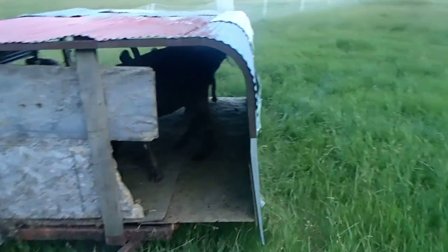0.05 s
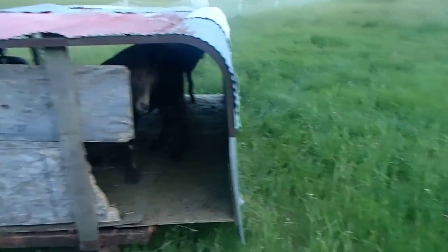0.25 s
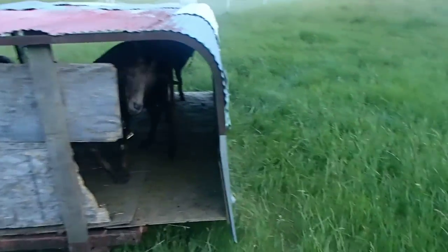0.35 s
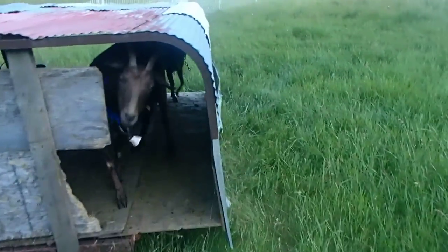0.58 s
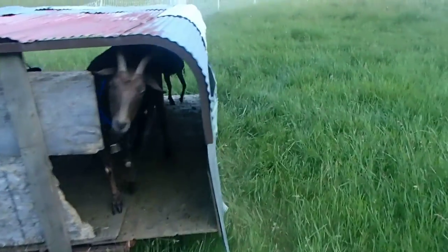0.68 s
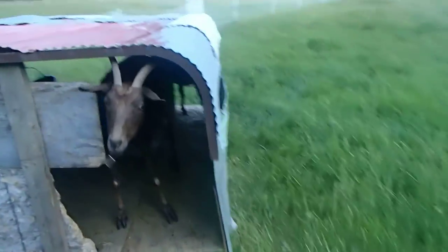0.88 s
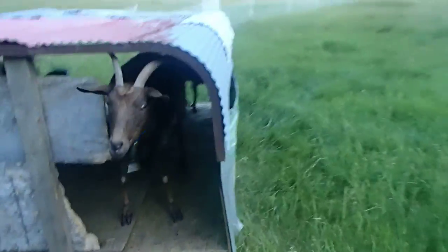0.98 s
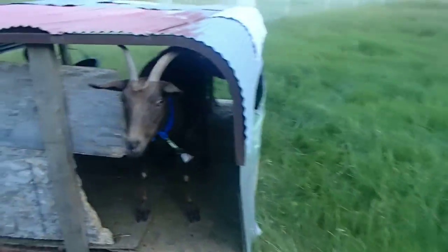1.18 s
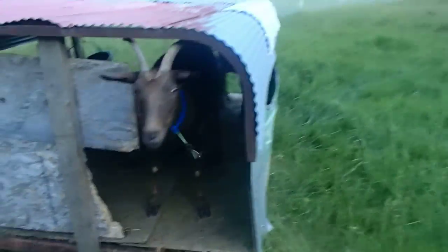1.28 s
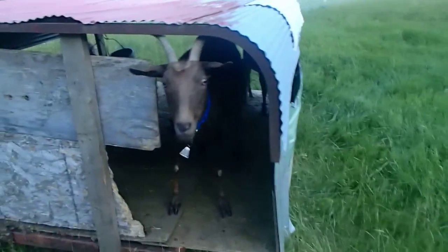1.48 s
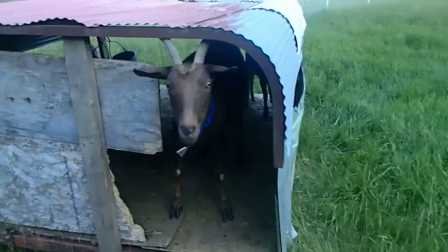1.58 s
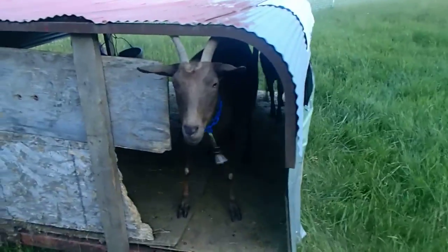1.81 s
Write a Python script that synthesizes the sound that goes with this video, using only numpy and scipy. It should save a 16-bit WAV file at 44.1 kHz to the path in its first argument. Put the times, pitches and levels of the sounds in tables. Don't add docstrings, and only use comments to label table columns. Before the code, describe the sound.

A small sheet-metal goat bell clanks at 0.1, 0.2 and 0.33 s, each stroke harder. From 0.4 s hooves scuff boards and kick pebbles, with a hard knock at 0.77 s and straw snaps. A light strike at 0.88 s precedes a run from 1.26 s, loudest at 1.55 s, then a last stroke at 1.85 s. Field hiss, straw rustle and tiny bird chirps lie behind; short wooden-shelter echo, close phone microphone.

```python
import sys
import numpy as np
from scipy import signal
from scipy.fft import rfft, irfft
from scipy.io import wavfile
from scipy.ndimage import uniform_filter1d

SR = 44100
rng = np.random.default_rng(int(sys.argv[2]) if len(sys.argv) > 2 else 0)


def store_pcm(level_fs):
    pcm = np.round(np.clip(level_fs, -1, 1) * 32767).astype(np.int16)
    wavfile.write(sys.argv[1], SR, np.atleast_2d(pcm).T)


def voltage_ratio(decibels):
    exponent = np.asarray(decibels, float) / 20
    return 10 ** exponent


N = 81585

# pitch_hz, level_db (per Hz)
FIELD_TONE = [(15, -45), (25, 10), (236, 1.5), (1100, -3), (1400, -8), (2410, -14), (3720, -4.5),
              (9570, -7.5), (16000, -6.5)]
# time_s, straw_db, shuffle_db
MOVEMENT = [(0.0, -41.5, -46), (0.334, -44, -51.5), (0.582, -42.5, -45), (0.716, -47, -57),
            (0.958, -44, -52.5), (1.16, -44, -58.5), (1.334, -48, -52.5), (1.448, -44.5, -48.5),
            (1.7, -45, -53), (1.85, -48, -57)]
# pitch_hz, level_db (per Hz)
STRAW_TONE = [(300, 6.5), (4600, -11.5), (5800, 6.5), (10500, 4), (12500, -0.5), (16000, -28)]
# pitch_hz, level_db (per Hz)
SHUFFLE_TONE = [(60, -31), (230, 9), (420, -7.5), (1250, -8), (1750, 10), (2050, -1.5), (2450, -10),
                (16000, -6.5)]
# start_s, length_s, level_db, start_hz, end_hz
CHIRPS = [
    (.678, 0.012, -43.5, 4060, 4200),
    (1.175, .012, -41, 7400, 4950),
    (1.593, .012, -32, 4000, 4300),
    (1.732, 0.0098, -37.5, 7760, 5400),
    (1.823, 0.011, -37, 7555, 4800),
]
# start_s, peak_db, centre_hz
STRAW_SNAPS = [(0.316, -21.5, 8950), (0.7955, -19.5, 6660), (0.802, -27, 7500), (0.814, -14, 7900),
               (0.839, -34, 6000), (0.9302, -16, 7540), (1.0272, -25.5, 9350), (1.2233, -26, 6740),
               (1.731, -17, 9008), (1.734, -23, 6600), (1.7947, -24, 8060), (1.7974, -22.5, 8500)]
# pitch_hz, level_db, t60_s (time to fade by 60 dB)
BOARD_MODES = [(135.5, -37, 0.024), (272, -2.5, 0.035), (365, -6.5, 0.04), (642, 3, 0.011),
               (894, -4.5, 0.013), (1190, -2, 0.014)]
# pitch_hz, level_db, t60_s
GRIT_MODES = [(870, -12.5, 0.016), (1280, -17, 0.0048), (1530, 2.5, 0.013), (1780, 5.5, 0.023),
              (1840, -21, 0.006763), (3000, -2, 0.004)]
# pitch_hz, level_db, t60_s
EDGE_MODES = [(870, -14.5, 0.027), (1300, -11, .01), (1581, 4.5, 0.015), (1797, -3, 0.015),
              (3050, -12, 0.01031), (5640, -13, 0.0073)]
# start_s, level_db, scrape_length_s, scuff_share_db
THUMPS = [(0.037, -42, 0.071, -2), (0.102, -48, 0.01475, 1), (0.424, -39, 0.019, -16),
          (0.402, -25, 0.006, -3.5), (0.414, -37, 0.029, -17), (0.688, -41, 0.044, 6),
          (0.542, -41, 0.046, -18), (.585, -43.5, 0.034, -20), (0.609, -28, 0.0074, 33),
          (0.621, -27.5, 0.0089, 26), (0.77, -34, 0.0055, -21), (0.786, -33, 0.0235, -26),
          (0.888, -43.5, 0.0345, -1), (1.12, -41, 0.054, 14), (1.205, -37, 0.024, -4),
          (1.223, -30, 0.017, -4), (1.237, -30, .012, -23), (1.461, -28, 0.011, -2.5),
          (1.484, -39.5, 0.014, -12), (0.931, -44.5, 0.043, -27), (.36, -47, 0.025, -21)]
# start_s, level_db
KNOCKS = [
    (0.045, -36),
    (.769, -6.5),
    (0.8148, -27.5),
    (1.0276, -37),
    (1.7285, -32),
]
# delay_s, level_db
KNOCK_ECHOES = [(.0065, -20), (.0105, -30), (0.017, -41), (.022, -49)]
# start_s, level_db, pitch_hz
HOOF_TAPS = [(.527, -27, 900), (.558, -29, 750), (.566, -25, 1000), (0.44, -28, 890), (0.589, -32, 560),
             (.601, -29, 1695), (.637, -38, 1400), (.672, -25.5, 880), (.184, -38, 630), (0.33, -37.5, 118),
             (.89, -38, 150), (.068, -31.5, 234), (1.1, -28.5, 330), (0.24, -43, 880), (.404, -19, 696),
             (0.35, -21, 1500), (1.3, -29, 930), (1.3, -28, 1900), (0.72, -24, 1780), (.611, -37, 1460),
             (1.1, -30, 760), (0.98, -36, 900)]
LOWER_BELL_HZ = [2579, 3150, 3601, 3798, 4143, 5572, 5719, 6523, 8299, 8386]
# level_db, t60_s, broad_wall_gain_db, lip_gain_db, seam_gain_db
BELL_MODES = [(-48, 0.21, 7, 6, -1.5), (-48, 0.64, 0, -3, -5), (-38, 0.18, 4, 11, -1.0),
              (-41, 0.65, 3, 1.3, -5), (-46, 0.18, 3.2, 1, -0.5), (-37.5, 0.58, 12, 14, 1),
              (-36.5, 0.12597, -17, 3.8, -3.3), (-28, 0.15, 10, -2, 1.7), (-40.5, 0.3, -11.5, -2.5, 0),
              (-34, 0.23, 8.5, 7, -2),
              (-42, 0.085, -1, 3, 6.5), (-23.5, 0.14, 3, -9.8, 7), (-34.5, 0.24, -11.5, 10, 8.5),
               (-36.2, 0.084, 4, -5, 18.5), (-42.5, 0.091, -3, -6.2, -9), (-53, 0.061, -3.37, 14, 5),
               (-41.5, 0.1, 0, -5, -4.5), (-42, 0.11, 5.5, -10, -9), (-38.5, 0.095, -4.3, -4, 4),
               (-37, 0.09, 2.7, -7.2, 3.0), (-47, 0.065, 5, 12.0, 6)]
UPPER_BELL_HZ = [7520, 9524, 9562, 10794, 11290, 11570, 12820, 12895, 13647, 13935, 15100]
# start_s, level_db, wall (-1 narrow, 1 broad), height (-1 crown, 1 lip), side (-1 middle, 1 seam)
STRIKES = [
    (.106, -8, 0.3, 0.52, -0.51),
    (.2079, 1.9, -0.19, 0.086, .53),
    (0.3327, 7.5, -0.83, -0.92, 0.21),
    (0.881, -3.5, -0.66, 0.42, -0.86),
    (1.2618, 3, 0.35, 0.14, 0.56),
    (1.3534, 6.5, 0.62, -0.2, -0.25),
    (1.4499, 1.5, 0.87, -0.0038, 0.2),
    (1.5528, 9.5, 0.73, -0.031, -1),
    (1.8478, 0.8, -1, -.49, .13),
]
# start_s, level_db, wall, height, side (as in STRIKES)
REBOUNDS = [
    (.245, -14.5, 0.84, 0.61, -0.84),
    (.906, -11.5, -0.32, .1, 0.64),
    (1.599, -7.5, -0.29, -.3, -0.83),
]
HUM_LEVELS = [-47, -25.5, -19.5, -28, -31, -20.5, -24.5, -22.5, -33]
# time_s, loss_db_per_s
COAT_DAMPING = [(0, 80), (.2, 0), (.26, 10), (.3, 70), (.4, 55), (.5, 75), (.55, 290), (.872, 330),
                (.935, 350), (.96, 30), (1.26, 40), (1.39, 30), (1.41, 100), (1.56, 90), (1.66, 130),
                (1.71, 220), (1.74, 270), (1.77, 5)]
LONGEST_MODES = [1, 3, 5]
# first_db, second_db, third_db
LONGEST_LEVELS = [(-53, -49.5, -48), (-51.5, -41.5, -35), (-33, -40.5, -53), (-47, -44, -57),
                  (-47.5, -43, -27), (-45, -35.5, -32.5), (-67, -33, -28.5), (-37.5, -29.5, -23),
                  (-50, -44, -42)]
# pitch_hz, level_db (per Hz)
CRACK_TONE = [(600, -28), (1300, -21), (1800, 5.5), (2600, -16.5), (5000, -11.5), (9000, 1), (14000, -4.5),
              (16500, -28)]


def colour(x, points):
    p = np.array(points, float)
    hz = np.fft.rfftfreq(len(x), 1 / SR) + 1
    level_db = np.interp(np.log(hz), np.log(p[:, 0]), p[:, 1])
    y = irfft(rfft(x) * voltage_ratio(level_db), len(x))
    return y / y.std()


def walk(rate, size=N):
    k = max(int(SR / rate), 2)
    noise = rng.standard_normal(size + 2 * k)
    w = uniform_filter1d(uniform_filter1d(noise, k), k)[k:-k]
    return w / w.std()


def add(out, at, x):
    i = int(at * SR)
    out[i:i + len(x)] += x[:N - i]


def ring(modes, phase, size):
    m, t = np.array(modes, float), np.arange(size) / SR
    fade = np.exp(-np.log(1000) * t / m[:, 2:3])
    return voltage_ratio(m[:, 1:2]) * np.sin(2 * np.pi * m[:, :1] * t + phase) * fade


def high_pass(x, hz):
    return signal.sosfilt(signal.butter(4, hz, "high", fs=SR, output="sos"), x)


def field():
    return voltage_ratio(-48.5) * colour(rng.standard_normal(N), FIELD_TONE)


def grains():
    hit = rng.random(N) < 2500 / SR
    size_db = np.minimum(5.5 * rng.exponential(size=N), 9)
    return rng.standard_normal(N) * (0.38 + hit * voltage_ratio(size_db))


def bedding():
    t, move = np.arange(N) / SR, np.array(MOVEMENT)
    straw_db = np.interp(t, move[:, 0], move[:, 1]) - 0.5 + 0.96 * walk(37.5)
    flicker = np.minimum(walk(35), 1.5)
    shuffle_db = np.interp(t, move[:, 0], move[:, 2]) + 5 + 2.97 * flicker
    return colour(grains(), STRAW_TONE) * voltage_ratio(straw_db) + colour(grains(), SHUFFLE_TONE) * voltage_ratio(shuffle_db)


def bird():
    out = np.zeros(N)
    for at, length, db, start_hz, end_hz in CHIRPS:
        u = np.linspace(0, 1, int(length * SR))
        pitch_hz = start_hz + (end_hz - start_hz) * u
        whistle = np.sin(2 * np.pi * np.cumsum(pitch_hz) / SR)
        add(out, at, voltage_ratio(db) * np.sin(np.pi * u) * whistle)
    return out


def straw_snaps():
    out, t = np.zeros(N), np.arange(300) / SR
    for at, db, hz in STRAW_SNAPS:
        b, a = signal.butter(1, [hz * 0.75, hz * 1.25], "band", fs=SR)
        burst = rng.standard_normal(300) * np.exp(-t / 0.00071)
        snap = signal.lfilter(b, a, burst)
        add(out, at, voltage_ratio(db) * snap / np.abs(snap).max())
    return out


def hoof_taps():
    out, t = np.zeros(N), np.arange(4000) / SR
    for at, db, hz in HOOF_TAPS:
        t60_s = 9 / hz
        tap = ring([(hz, db, t60_s), (1.93 * hz, db - 14, t60_s)], 0, 4000).sum(axis=0)
        add(out, at, tap * (1 - np.exp(-t / 0.00037)))
    return out


def hoof_thumps():
    out, t = np.zeros(N), np.arange(4000) / SR
    boards = ring(BOARD_MODES, 0, 4000).sum(axis=0)
    scuff = ring(GRIT_MODES, 0, 4000).sum(axis=0)
    for at, db, length, scuff_db in THUMPS:
        noise, roughness = rng.standard_normal((2, 4000))
        press = np.sin(np.pi * np.clip(t / length, 0, 1)) ** 0.5
        grit = noise * voltage_ratio(2.43 * roughness) * press
        thump = high_pass(signal.fftconvolve(grit, boards + voltage_ratio(scuff_db) * scuff), 125)
        add(out, at, voltage_ratio(db) * 2 * thump / np.abs(thump).max())
    return out


def hoof_knocks():
    out, t = np.zeros(N), np.arange(4000) / SR
    edge = ring(EDGE_MODES, 0, 4000).sum(axis=0)
    blow = high_pass(edge * (1 - np.exp(-t / 0.00032)), 400)
    for at, db in KNOCKS:
        for delay, echo_db in [(0.0002, 0)] + KNOCK_ECHOES:
            add(out, at + delay, voltage_ratio(db + echo_db) * blow)
    return out


def bell():
    out = np.zeros(N)
    m = np.c_[LOWER_BELL_HZ + UPPER_BELL_HZ, BELL_MODES]
    swing = voltage_ratio(1.5 * np.array([walk(13.6) for _ in m]))
    loss_db = np.cumsum(np.interp(np.arange(N) / SR, *np.array(COAT_DAMPING).T)) / SR
    starts = np.array([s[0] for s in STRIKES] + [N / SR])
    hum_levels = HUM_LEVELS + [-120] * len(REBOUNDS)
    crack_fade = np.exp(-np.arange(1024) / SR / 0.0032)
    for k, ((at, db, *place), hum_db) in enumerate(zip(STRIKES + REBOUNDS, hum_levels)):
        i = int(at * SR)
        n = int(starts[starts > at][0] * SR) - i
        t = np.arange(n) / SR
        modes = np.c_[m[:, 0], m[:, 1] + db + m[:, 3:] @ place, m[:, 2]]
        if k < len(LONGEST_LEVELS):
            modes[LONGEST_MODES, 1] = LONGEST_LEVELS[k]
        phase = rng.uniform(0, 2 * np.pi, (len(m), 1))
        tone = (ring(modes, phase, n) * swing[:, i:i + n]).sum(axis=0)
        hum_fade = voltage_ratio(hum_db + loss_db[i] - loss_db[i:i + n])
        hum = hum_fade * np.sin(2 * np.pi * 1409 * t)
        contact = 1 - np.exp(-t / 0.00044)
        add(out, at, (tone + hum) * contact)
        crack = colour(rng.standard_normal(1024), CRACK_TONE) * crack_fade
        add(out, at, voltage_ratio(db - 25) * crack)
    return out


def shelter(sound):
    t = np.arange(8000) / SR
    tail = rng.standard_normal(8000) * np.exp(-np.log(1000) * t / 0.16)
    tail[:150] = 0
    return signal.fftconvolve(sound, tail / np.sqrt(np.sum(tail ** 2)))[:N]


def scene():
    background = field() + bedding() + bird()
    floor = straw_snaps() + hoof_taps() + hoof_thumps() + hoof_knocks()
    chime = bell()
    echo = voltage_ratio(-10) * shelter(floor + voltage_ratio(-13) * chime)
    mono = background + floor + chime + echo
    return np.array([mono, mono])


def top_cut(x):
    return signal.sosfilt(signal.butter(12, 16260, fs=SR, output="sos"), x)


def record(dry):
    x = signal.sosfilt(signal.butter(2, [72, 14100], "band", fs=SR, output="sos"), dry)
    x = signal.sosfilt(signal.ellip(8, 0.2, 60, 15900, fs=SR, output="sos"), x)
    return top_cut(x)


dry = scene()
out = record(dry)
store_pcm(out)
```